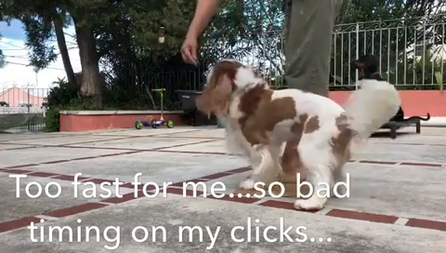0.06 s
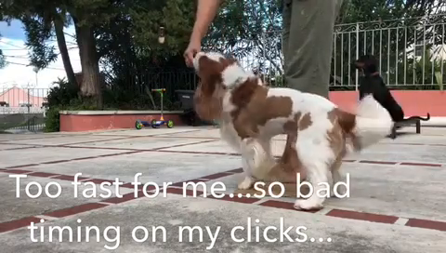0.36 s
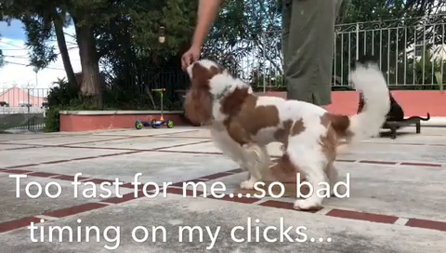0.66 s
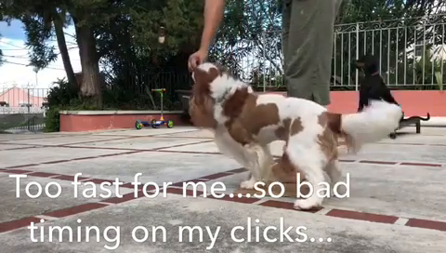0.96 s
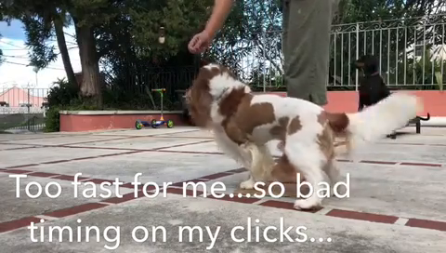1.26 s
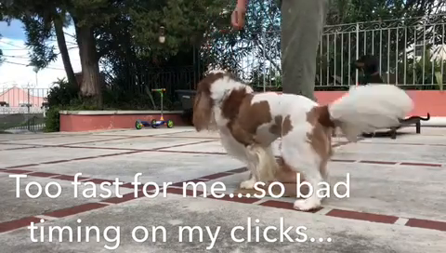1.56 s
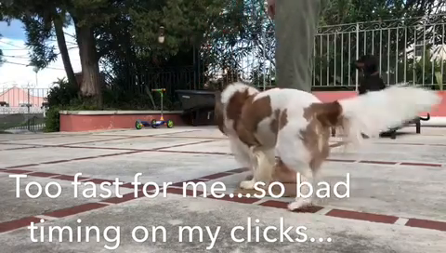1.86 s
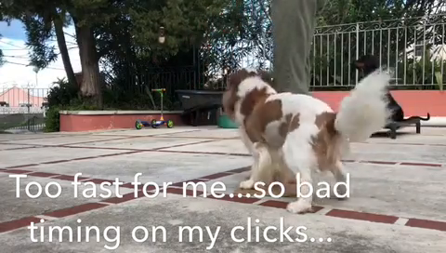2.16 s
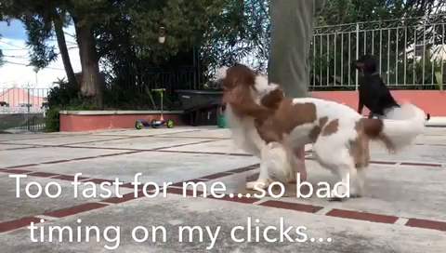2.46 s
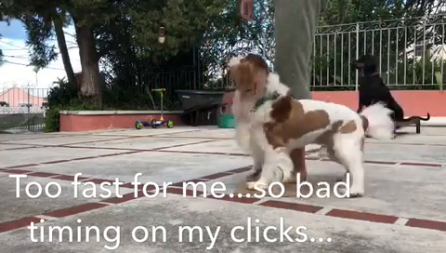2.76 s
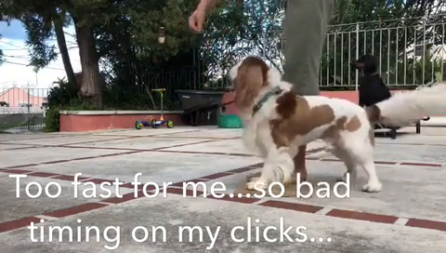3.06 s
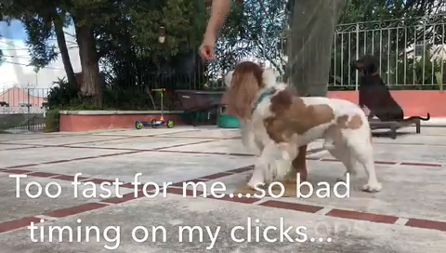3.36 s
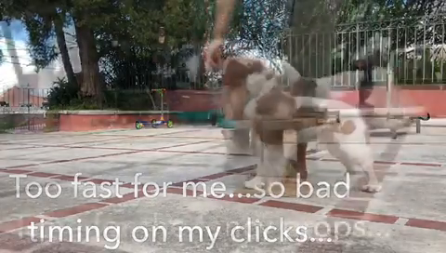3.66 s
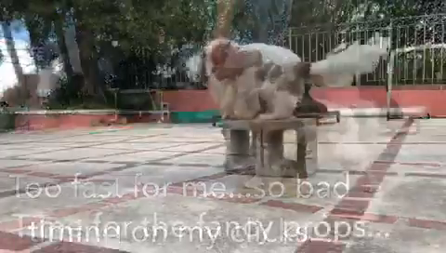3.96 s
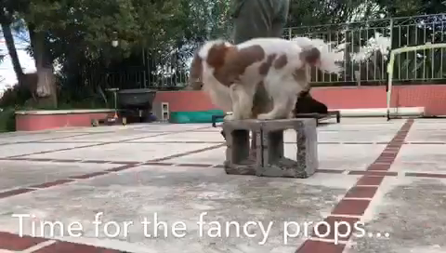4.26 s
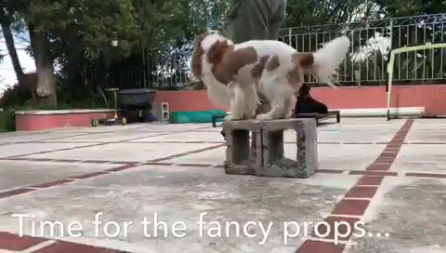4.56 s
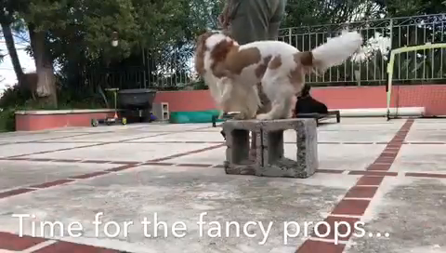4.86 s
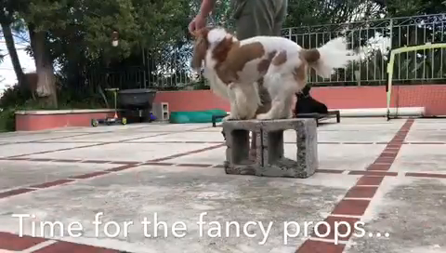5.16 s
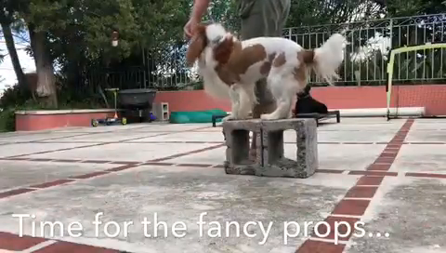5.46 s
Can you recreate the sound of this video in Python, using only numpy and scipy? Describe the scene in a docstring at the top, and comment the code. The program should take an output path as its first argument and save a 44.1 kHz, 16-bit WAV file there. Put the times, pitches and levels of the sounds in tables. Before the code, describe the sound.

A handheld training clicker is pressed and released twice, about two seconds apart, each time making a crisp metallic pair of snaps that echoes briefly off the yard walls. Between the pairs come two quick rising bird chirps and some soft low bumps. Everything else is very faint: distant town rumble, moving air, two far dull bangs, a far bird and slight rustling close to the microphone.

```python
"""Low town rumble, moving air and a high hiss come first, with tiny ticks, rustles and a far bird.
Then a training clicker is pressed and let go twice in the paved yard: its steel tongue buckles and
springs flat, and each snap rings the modes of tongue and case and echoes off walls and trees.
Around the first pair of snaps something brushes near the microphone and two dull bangs sound far off.
Between the pairs a small bird chirps, in quick upward glides, over a few soft low bumps."""
import sys
import numpy as np
from scipy import signal
from scipy.fft import rfft, irfft, next_fast_len
from scipy.io import wavfile
from scipy.ndimage import map_coordinates

SR = 44100
rng = np.random.default_rng(int(sys.argv[2]) if len(sys.argv) > 2 else 0)


def transcribe(signal):
    """Save signal, clipped to [-1, 1], as a 16-bit WAV file at the path in sys.argv[1]."""
    frames = np.atleast_2d(signal).T
    limited = np.clip(frames, -1, 1)
    pcm = np.round(limited * 32767).astype(np.int16)
    wavfile.write(sys.argv[1], SR, pcm)


N = 251370

# Modes of tongue and case as the tongue buckles, and as it springs flat.
# Each row: frequency in Hz, swell and decay time in ms, relative level in dB.
BUCKLING_MODES = [(1600, 1, -26.5), (3778, 1, -12), (3893, 1, -9), (5000, 0.73, -12.5), (5700, 0.77, -12.5),
                  (6836, 0.48, -1), (7110, 0.55, 1.5), (8330, .55, -14.5), (9700, .55, -9),
                  (10680, 0.37, -8.5), (13393, 0.45, -23.5), (15310, .45, -15)]
FLATTENING_MODES = [(1485, 0.78, -29), (2583, 0.33, -16.5), (3660, 0.82, -12), (4380, 0.68, -3.5),
                    (5415, 0.66, -4.5), (6890, 0.71, -2), (7480, 0.5, -1.6), (7950, 0.51, -8.5),
                    (9550, 0.5, -15), (10800, 0.55, -9), (11800, 0.38, -11.5), (13800, 0.43, -17.5),
                    (15200, 0.53, -16)]
# Snaps. Each row: start in seconds, level in dB, tongue tuning ratio, cupped case tuning ratio,
# brightness in dB per octave, sizzle in dB, rebound delay in ms, then rebound, case boom and echo in dB.
PRESSES = [(2.7047, -20, 1.012, .94, 1.5, 2, 0.91, -10, 3, -9),
           (4.7441, -21, 1.008, 1.013, 1.25, -3, .75, 5, -5.5, -11.5)]
RELEASES = [(2.8342, -16.5, 1.012, 0.96, 0.066, 1.5, 1.2, -6, -6.5, -10.5),
            (4.8502, -16, 0.981, 0.95, 0.63, -1.6, 1.299, -3.5, -0.5, -11.5)]
# Spectrum of the case's rattle. Each row: frequency in Hz, level in dB, share of boom, share of sizzle.
RATTLE_SPECTRUM = [(1000, -33.5, 0, 0), (2800, -22, 1, 0), (3550, 3, 0, 0), (8000, -.5, 0, 0),
                   (11500, -6.5, 0, 0), (13000, -15.5, 0, 1), (16000, -13, 0, 1)]
# Reverberation of the yard. Each row: frequency in Hz, time to fall 60 dB in seconds.
YARD_DECAY = [(1500, 0.5), (4000, 0.28), (7000, 0.3), (11000, .31), (16000, 0.15)]
# Colour of the wall echo, and of the birds' octave. Each row: frequency in Hz, gain in dB.
WALL_RESPONSE = [(1500, 1), (3000, 1), (4000, -5.5), (5400, 1), (7000, -4), (11000, -4.5), (15500, -1.5)]
THROAT_RESPONSE = [(3000, 0), (6000, 0), (7000, 11), (8000, -1), (9500, 2), (10300, -9), (12000, -26)]
# Near bird. Each row: moment of the upward flick in seconds, relative level in dB,
# flick time and lead-in in seconds, top pitch in Hz.
NEAR_CHIRPS = [(3.311, -50, .005, .022, 5920), (3.518, -44, .0105, .093, 5770)]
# Far bird. Each row: start and length in seconds, relative level in dB, top pitch in Hz,
# time to the top in seconds.
FAR_WHISTLES = [(.81, 0.28, -72, 3805, .08), (3.89, 0.42, -72, 3926, .11), (4.3, .1, -71, 3660, .04),
                (4.55, .15, -73, 3750, .13)]
# Soft contacts. Each row: centre in seconds, push in dB, push frequency in Hz,
# half length in seconds, scuff in dB.
SOFT_BUMPS = [(3.232, -49.5, 74.6, 0.013, -64), (3.349, -37.5, 77, 0.0046, -54),
              (3.398, -49, 95, 0.014, -64), (3.444, -44, 161, 0.0096, -49.5),
              (3.47, -37, 188, 0.013, -40.5), (3.614, -44, 117, 0.0065, -58), (3.637, -52, 222, 0.021, -51),
              (3.675, -49, 99, 0.017, -68), (3.876, -47.5, 119, 0.0074, -61)]
# Distant bangs. Each row: start in seconds, level in dB, hold before fading in seconds.
FAR_BANGS = [(2.312, -54.5, 0.056), (2.926, -56, 0.045)]
# Dry contacts. Each row: start in seconds, relative level in dB, centre frequency in Hz,
# time to fall 60 dB in seconds, gain an octave away in dB.
DRY_TICKS = [(0.5395, -47, 3250, 0.028, -18), (1.4173, -55, 1980, 0.085, -17),
             (3.2466, -54.5, 5170, 0.062, -26), (3.4944, -53, 11000, .012, -20),
             (4.366, -57, 6000, 0.038, -7), (4.687, -54, 3920, .018, -14), (4.7215, -57, 6900, .014, -30),
             (5.478, -55.5, 6440, 0.033, -6.5)]
# Brushing strokes. Each row: start and hold in seconds, level in dB.
BRUSH_STROKES = [(0.438, .04, -74.5), (1.645, .36, -76), (2.011, 0.018, -69.5), (2.203, 0.1, -65.5),
                 (2.49, 0.073, -64.5), (2.598, 0.021, -65), (2.925, 0.063, -63.5), (3.265, .02, -70.5),
                 (3.333, 0.019, -64), (3.677, 0.015, -73.5)]
# Rustles. Each row: peak time in seconds, level in dB, half length in seconds.
FAINT_RUSTLES = [(0.462, -72.5, 0.024), (0.737, -73, .02), (5.26, -78, 0.039), (5.505, -70, 0.02),
                 (5.631, -74.5, 0.06)]
# Spectra of the noise sources. Each row: frequency in Hz, relative level in dB.
SCUFF_SPECTRUM = [(25, -4), (60, 4.5), (200, 3), (400, 4), (620, -12.5), (760, -23), (2000, -55)]
BANG_SPECTRUM = [(60, -19), (150, -2.5), (300, -1), (520, -1), (750, -1.5), (1100, -4), (1500, -13),
                 (2200, -15.5), (3500, -27), (8000, -60)]
BRUSH_SPECTRUM = [(200, -5), (700, 9), (1600, -1.5), (3000, -0.5), (5000, 1), (8000, -2.5), (12000, -6),
                  (16000, -7.5)]
RUSTLE_SPECTRUM = [(1500, -26), (3200, -10), (4400, 2), (5500, -4), (8000, -15), (16000, -21)]
TOWN_SPECTRUM = [(15, -40), (25, -25), (38, -13.5), (55, -9), (88, -0.5), (130, -7), (185, -7),
                 (240, -12.5), (320, -15), (600, -33.5), (2000, -90.5)]
AIR_SPECTRUM = [(100, -26), (220, -5.5), (320, -2), (470, -1), (700, -3.5), (1200, -8.5), (2000, -14),
                (3200, -24.5), (8000, -60.5)]
HISS_SPECTRUM = [(600, -40.5), (1500, -9.5), (2500, -2.5), (3500, -1), (5500, -1.5), (7000, -4.5),
                 (9000, -6), (13000, -11), (16000, -16.5)]


def clicker(snaps, modes, ground_s, ground_db, rattle_db, scatter_db, lowest_hz, rattle_t60=0.02):
    """Snap-through buckling: a blow, its rebound and a case rattle, with ground and wall reflections."""
    out, t = np.zeros(N), np.arange(SR // 30) / SR
    for s, db, tuning, cupping, bright_db, sizzle_db, rebound_ms, rebound_db, boom_db, echo_db in snaps:
        grip = tuning, cupping, bright_db, sizzle_db, boom_db
        blow = tongue(modes, t, *grip)
        rebound = tongue(modes, t - rebound_ms / 1000, *grip)
        snap = blow + amp(rebound_db) * rebound
        colour = [(hz, base_db + boom * boom_db + sizzle * sizzle_db)
                  for hz, base_db, boom, sizzle in RATTLE_SPECTRUM]
        rattle = noise(colour)[:len(t)] * amp(rattle_db - 60 * t / rattle_t60)
        add(out, s, amp(db) * (snap + rattle))
        add(out, s + ground_s, amp(db + ground_db) * snap)
        # the walls gather sound from all sides of the case, so each part scatters its own way
        echo = yard(blow) + amp(rebound_db) * yard(rebound) + amp(scatter_db) * yard(rattle)
        add(out, s, amp(db + echo_db) * echo)
    return highpass(out, lowest_hz)  # so small a case radiates no bass


def tongue(modes, t, tuning, cupping, bright_db, sizzle_db, boom_db):
    """Modal vibration of steel and case, damped by the thumb; the cupped hand shifts the low modes."""
    hz, life_ms, db = np.transpose(modes)[:, :, None]
    colour_db = bright_db * np.log2(hz / 6000) + boom_db * (hz < 3000) + sizzle_db * (hz > 11500)
    hz = hz * np.where(hz < 4700, cupping, tuning)
    t = np.maximum(t, 0)
    age = t * 1000 / life_ms
    envelope = amp(db + colour_db) * age * np.exp(1 - age)
    return np.sum(envelope * np.sin(2 * np.pi * hz * t), axis=0)


def yard(x, build_up_s=0.0024):
    """Diffuse reverberation: walls and trees scatter sound into a tail whose treble dies first."""
    hz, t, spectra = signal.stft(rng.standard_normal(SR // 2), SR, nperseg=256)
    decay = amp(-60 * t / along(YARD_DECAY, hz)[:, None])
    tail = signal.istft(spectra * decay, SR, nperseg=256)[1]
    tail *= 1 - np.exp(-np.arange(len(tail)) / SR / build_up_s)
    impulse_response = filtered(tail / np.linalg.norm(tail), lambda f: amp(along(WALL_RESPONSE, f)))
    return signal.fftconvolve(x, impulse_response)


def bird(calls, waver, flutter_db, overtone_db, direct_db, echo_db):
    """Source and filter: a fluttering tone with a weak octave shaped by the throat, and its echo."""
    song = np.zeros(N)
    for hz, strength in calls:
        phase = 2 * np.pi * np.cumsum(hz * (1 + waver * wobble(500))) / SR
        octave = amp(overtone_db + along(THROAT_RESPONSE, 2 * np.abs(hz))) * np.sin(2 * phase)
        song += strength * amp(flutter_db * wobble(180)) * (np.sin(phase) + octave)
    return amp(direct_db) * song + amp(echo_db) * yard(song)[:N]


def chirps(low_hz=4300, dip_hz=900, lift_hz=386, sag_hz_per_s=5000, hold_s=0.039, onset_s=0.0037):
    """Frequency and amplitude modulation: a dipping lead-in, a grace note, a loud flick, a thin top."""
    t = np.arange(N) / SR
    for s, db, flick_s, lead_s, top_hz in NEAR_CHIRPS:
        flicks = (t - s) / flick_s  # time in flick lengths, zero at mid-glide
        hz = low_hz + (top_hz - low_hz) * (1 + np.tanh(flicks)) / 2
        hz -= sag_hz_per_s * np.clip(t - s - hold_s / 2, 0, .5)
        hz -= dip_hz * bell(flicks, centre=-6.3, width=1.9)
        hz += lift_hz * bell(flicks, centre=-2.72, width=0.71)  # the grace note lifts the pitch
        thin = amp(-14.5) * swell(t, s - lead_s + onset_s, lead_s + hold_s, rise=onset_s, fall=0.019)
        grace = amp(-7.5) * bell(flicks, centre=-3.2, width=0.53)
        accent = bell(flicks, centre=-.85, width=1)
        yield hz, amp(db) * (thin + grace + accent)


def whistles(arch_hz_per_s2=14000):
    """Slow modulation: the pitch follows a parabola while the amplitude swells and fades."""
    for s, length, db, top_hz, to_top in FAR_WHISTLES:
        age = np.clip(np.arange(N) / SR - s, 0, length)
        hz = top_hz - arch_hz_per_s2 * (age - to_top) ** 2
        yield hz, amp(db) * np.sin(np.pi * age / length)


def bumps():
    """Soft impacts excite low frequencies: a brief pressure push inside a dull scuff."""
    out, t, scuff = np.zeros(N), np.arange(N) / SR, noise(SCUFF_SPECTRUM)
    for s, db, hz, half_s, scuff_db in SOFT_BUMPS:
        push = -amp(db) * np.cos(2 * np.pi * hz * (t - s))
        out += bell(t, s, half_s) * (push + amp(scuff_db) * scuff)
    return out


def bangs(rise_s=0.0046, t60=0.69):
    """Multipath propagation: far bangs arrive as a smear of echoes with little treble."""
    out, t = np.zeros(N), np.arange(SR) / SR
    for s, db, hold_s in FAR_BANGS:
        onset = 1 - np.exp(-t / rise_s)
        fade = amp(db - 60 * np.maximum(t - hold_s, 0) / t60)
        add(out, s, onset * fade * noise(BANG_SPECTRUM)[:len(t)])
    return out


def ticks(gain_db=-7):
    """Exponential decay: each small dry contact is a noise burst around its own pitch."""
    out, t = np.zeros(N), np.arange(SR // 10) / SR
    for s, db, hz, t60, skirt_db in DRY_TICKS:
        band = [(hz / 4, 2 * skirt_db), (hz, 0), (hz * 4, 2 * skirt_db)]
        add(out, s, noise(band)[:len(t)] * amp(db + gain_db - 60 * t / t60))
    return out


def brushing(grain_db=2.0):
    """Sliding friction: skin or cloth near the microphone gives an uneven hiss with each stroke."""
    t = np.arange(N) / SR
    strokes = sum(amp(db) * swell(t, s, hold, rise=.016, fall=.023) for s, hold, db in BRUSH_STROKES)
    return strokes * amp(grain_db * wobble(120)) * noise(BRUSH_SPECTRUM)


def rustles(grain_db=3):
    """Fast random amplitude modulation makes faint puffs of noise sound grainy."""
    t = np.arange(N) / SR
    envelope = sum(amp(db) * bell(t, s, half_s) for s, db, half_s in FAINT_RUSTLES)
    return envelope * unit(amp(grain_db * wobble(200)) * noise(RUSTLE_SPECTRUM))


def background():
    """Ambient noise: town rumble and moving air swell once; the high hiss steps down and stays lower."""
    t = np.arange(N) / SR
    town_db = -62.5 + 7.3 * swell(t, start=3.403, hold=0, rise=0.13, fall=0.601)
    air_db = -71 + 3.8 * swell(t, start=3.2, hold=0, rise=.7, fall=.8)
    hiss_drop = (1 + np.tanh((t - 4.2) / 0.039)) / 2
    hiss_db = -73.5 - 4 * hiss_drop
    town = amp(town_db + 1.4 * wobble(16)) * noise(TOWN_SPECTRUM)
    air = amp(air_db + 0.66 * wobble(8.7)) * noise(AIR_SPECTRUM)
    hiss = amp(hiss_db + 0.7 * wobble(15)) * noise(HISS_SPECTRUM)
    return town + air + hiss


def amp(db):
    """Amplitude ratio of a level in decibels."""
    return 10 ** (np.asarray(db) / 20)


def unit(x):
    """Normalisation to rms 1."""
    return x / np.sqrt(np.mean(x ** 2) + 1e-20)


def along(points, hz):
    """Interpolation of (Hz, value) points on a logarithmic frequency axis."""
    knot_hz, values = np.transpose(points)
    return np.interp(np.log(hz + 1), np.log(knot_hz + 1), values)


def bell(t, centre, width):
    """A bell-shaped pulse, down to 1/e one width from its centre."""
    return np.exp(-((t - centre) / width) ** 2)


def swell(t, start, hold, rise, fall):
    """A rounded envelope that reaches 1 at start, holds and falls."""
    return bell(np.minimum(t, start), start, rise) * bell(np.maximum(t - start, hold), hold, fall)


def wobble(rate):
    """Smooth random modulation with rate knots a second."""
    knots = rng.standard_normal(int(N * rate / SR) + 4)
    return map_coordinates(knots, [np.arange(N) * rate / SR])


def filtered(x, response):
    """Linear filtering: the spectrum is multiplied by a frequency response."""
    size = next_fast_len(len(x) + 8192)
    return irfft(rfft(x, size) * response(np.fft.rfftfreq(size, 1 / SR)), size)[:len(x)]


def highpass(x, cutoff_hz):
    """Fourth-order attenuation below the cutoff."""
    return signal.sosfilt(signal.butter(4, cutoff_hz, "highpass", fs=SR, output="sos"), x)


def noise(spectrum):
    """White noise shaped to a spectrum, at rms 1."""
    return unit(filtered(rng.standard_normal(N), lambda hz: amp(along(spectrum, hz))))


def add(track, s, sound):
    """Superpose a sound on the track at s seconds."""
    part = track[round(s * SR):][:len(sound)]
    part += sound[:len(part)]


def scene():
    """Superposition: the pressures of all sources add at one microphone."""
    press = clicker(PRESSES, BUCKLING_MODES, ground_s=0.0041, ground_db=-26.5,
                    rattle_db=-19.5, scatter_db=7.0, lowest_hz=1250)
    release = clicker(RELEASES, FLATTENING_MODES, ground_s=0.0066, ground_db=-18.5,
                      rattle_db=-16.5, scatter_db=3.0, lowest_hz=1270)
    near_bird = bird(chirps(), waver=0.0152, flutter_db=3.0, overtone_db=-15.5, direct_db=-6, echo_db=-11)
    far_bird = bird(whistles(), waver=0.03, flutter_db=2.5, overtone_db=-36, direct_db=-4.5, echo_db=-2)
    small_sounds = ticks() + rustles() + bumps() + bangs() + brushing()
    return (press + release + near_bird + far_bird + small_sounds + background())[None]


def record(dry, lowest_hz=32, top_hz=15900):
    """Band limiting: the microphone sheds the deepest bass and the recorder cuts the highest treble."""
    sound = highpass(dry[0], lowest_hz)
    return filtered(sound, lambda hz: 1 / np.sqrt(1 + (hz / top_hz) ** 120))[None]


dry = scene()
out = record(dry)
transcribe(out)
```